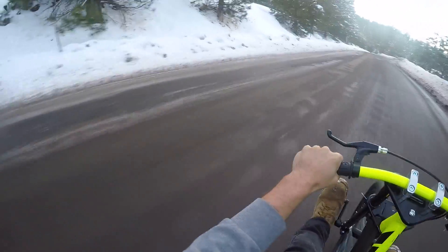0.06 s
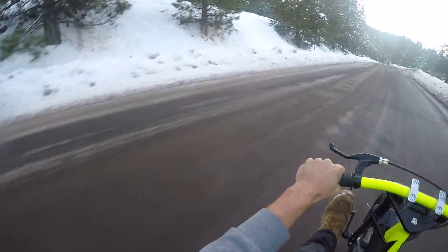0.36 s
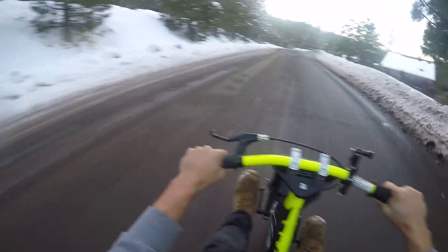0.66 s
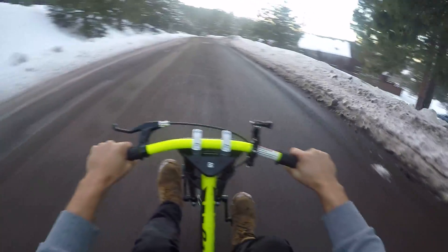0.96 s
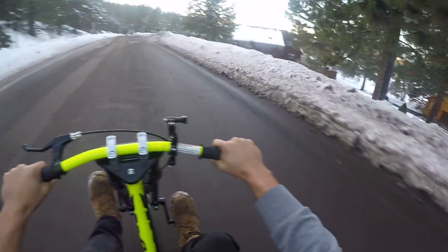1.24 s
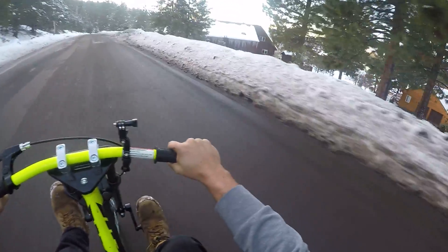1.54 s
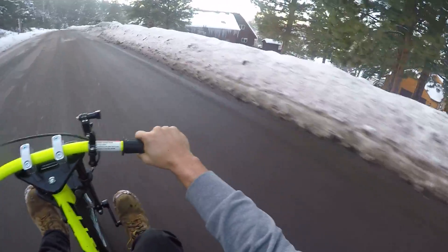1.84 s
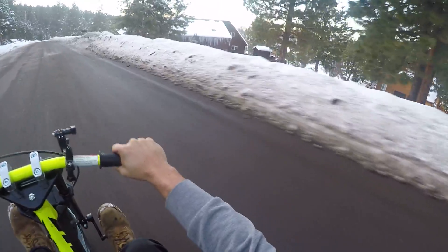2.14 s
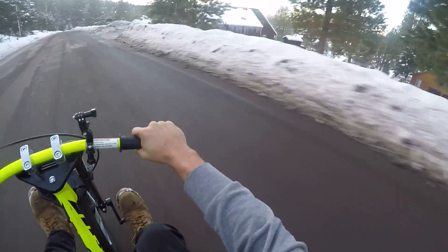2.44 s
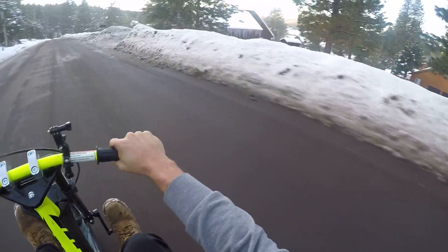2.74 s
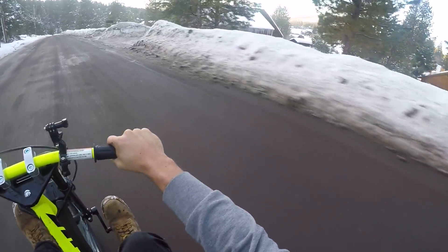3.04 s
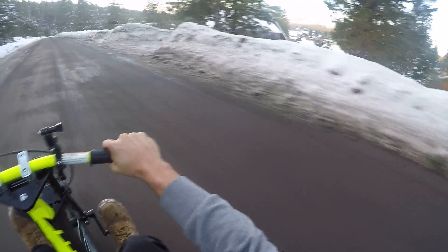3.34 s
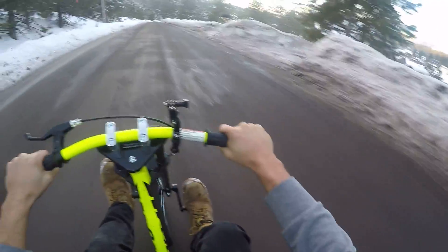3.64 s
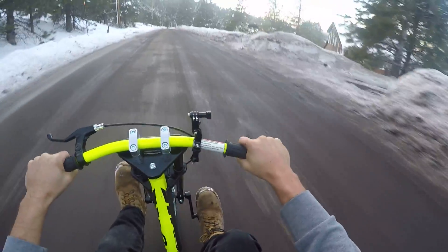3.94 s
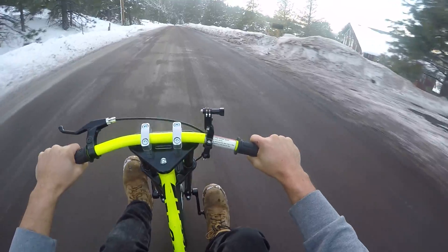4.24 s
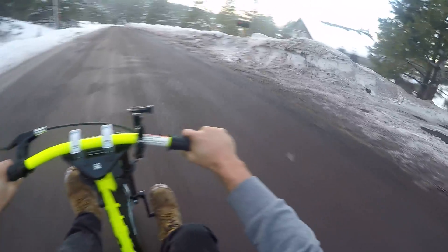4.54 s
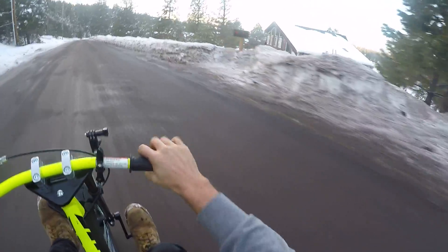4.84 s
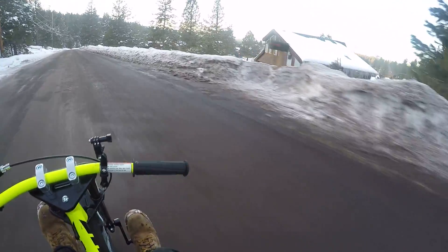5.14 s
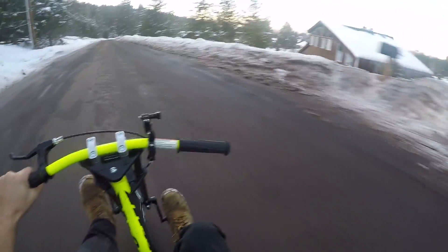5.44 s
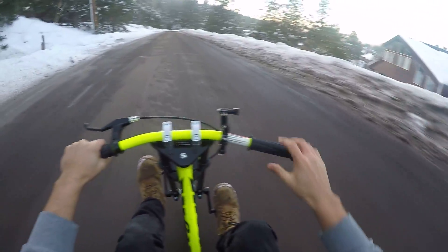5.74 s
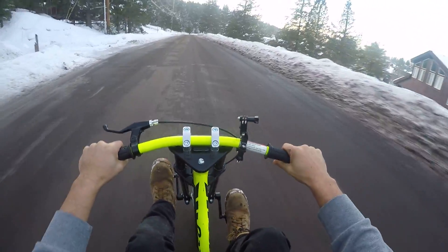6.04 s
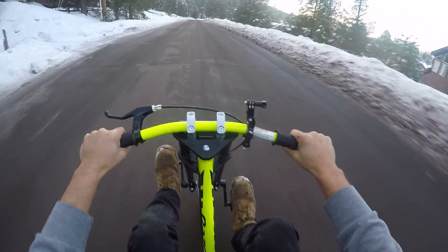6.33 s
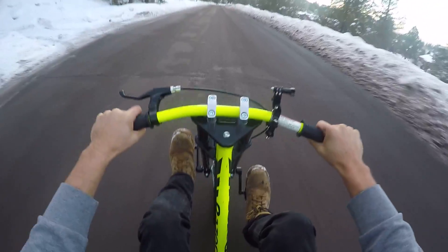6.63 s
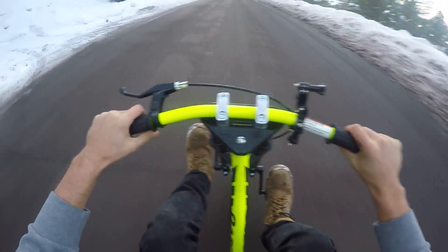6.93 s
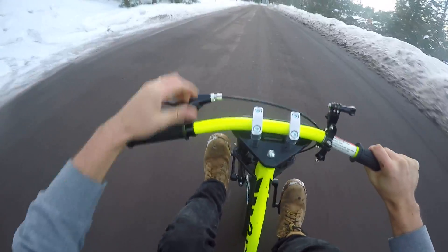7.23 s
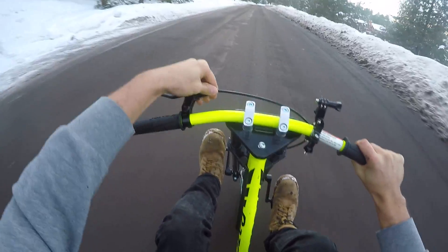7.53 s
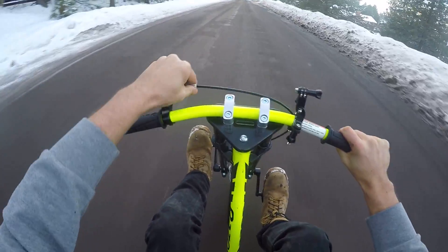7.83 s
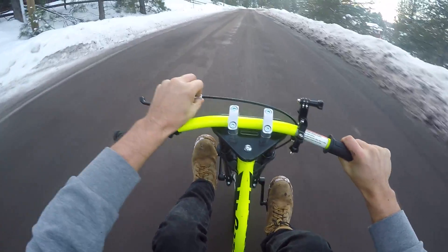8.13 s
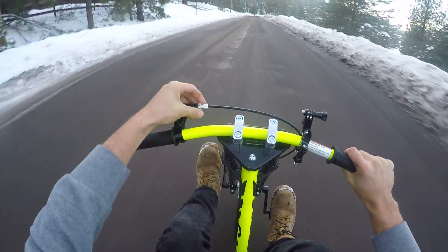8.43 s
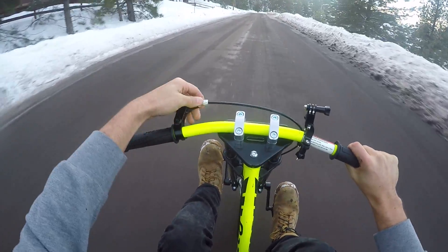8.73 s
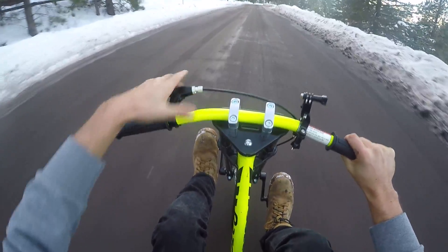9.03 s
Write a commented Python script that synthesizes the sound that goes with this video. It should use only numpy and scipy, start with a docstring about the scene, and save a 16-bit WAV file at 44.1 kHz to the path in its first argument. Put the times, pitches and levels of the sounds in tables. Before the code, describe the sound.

Wind rumbles and buffets a microphone on the rider for the whole nine seconds or so, while a drift trike's hard plastic wheels scrub over wet asphalt, crunch grit and throw a fine hiss of spray. The wind swells at about 0.7, 1.3 and 3.6 seconds. Small stones crack irregularly from the start, mixed with a few bright ticks like drops hitting the microphone. The grit crunches harder just after 2 seconds and again around 4. The wheels have a hollow, rasping ring as they slide, which changes as the trike straightens between 6 and 7 seconds. From there the scrub and spray are stronger. The loudest crack comes at about 7.1 seconds, followed by a cluster of smaller ones from 7.7 to 8.3 and a few more after. Short gusts thump the microphone near 7.3, 8.5 and 8.9 seconds as the trike keeps rolling.

```python
"""The hard plastic rear wheels of a drift trike, coasting down a wet, gritty road.
Heard close, from a microphone on the rider, they scrub on the asphalt, crunch grit, throw spray
and crack small stones. Their ring changes as the trike slides through bends or runs straight.
A few bright ticks, such as a drop hitting the microphone, fall among the cracks.
Behind them, wind rumbles off the rider's body and buffets the microphone."""
import sys
import numpy as np
from scipy import signal
from scipy.fft import rfft, irfft
from scipy.io import wavfile
from scipy.ndimage import uniform_filter1d, minimum_filter1d

SR = 44100
rng = np.random.default_rng(int(sys.argv[2]) if len(sys.argv) > 2 else 0)


def wrap_up_sound(samples):
    """Save the sound to the file named by the first command line argument, as 16-bit audio."""
    columns = np.atleast_2d(samples).T
    # keep every value between -1 and 1, then stretch to whole-number steps
    tamed = np.clip(columns, -1, 1)
    steps = np.round(tamed * 32767).astype(np.int16)
    wavfile.write(sys.argv[1], SR, steps)


N = 409248
TIME = np.arange(N) / SR


def amp(db):
    """Decibels to gain."""
    return 10 ** (np.asarray(db) / 20)


def unit(x):
    """Scales to an rms of one."""
    return x / np.sqrt(np.mean(x ** 2) + 1e-20)


def curve(rows):
    """A table of times and values, sample by sample."""
    return np.interp(TIME, *np.transpose(rows))


def spectrum_db(tone, hz):
    """Joins the points of a spectrum along a log-frequency axis."""
    points_hz, db = np.transpose(tone)
    return np.interp(np.log(hz + 1), np.log(points_hz + 1), db)


def bins(size):
    """Frequencies of a transform, in Hz."""
    return np.fft.rfftfreq(size, 1 / SR)


def wander(rate_hz, size=8192):
    """Smooth random drift with an rms of about one."""
    hz = np.fft.rfftfreq(size, N / SR / size)
    slow = rfft(rng.standard_normal(size)) / (1 + (hz / rate_hz) ** 4)
    return np.interp(TIME, np.linspace(0, N / SR, size), unit(irfft(slow, size)))


def swells(rows):
    """Each row rises and falls in one smooth arch; returns the dB added to each of two layers."""
    out = np.zeros((2, N))
    for peak_s, length_s, *db in rows:
        out += np.outer(db, np.cos(np.pi * np.clip((TIME - peak_s) / length_s, -.5, .5)))
    return out


# The line down the hill: time_s, slide_fraction
SIDEWAYS_SLIDE = [(0, 0.58), (.5, 0.74), (.8, 0.33), (1.3, 0.56), (1.7, 0.9), (3.5, 0.92), (3.8, 0.66),
                  (5.3, 1), (5.8, 0.55), (6.4, 0.46), (6.8, 0), (9.28, 0.03)]
def sliding():
    """How far the trike slides: 0 running straight, 1 fully drifting."""
    return np.clip(curve(SIDEWAYS_SLIDE), 0, 1)


def turbulence(straight_tone, cross_tone):
    """Air at the microphone; in a slide it comes from the side and booms differently."""
    slide = sliding()
    straight, cross = (unit(irfft(rfft(rng.standard_normal(N)) * amp(spectrum_db(tone, bins(N))), N))
                       for tone in (straight_tone, cross_tone))
    return np.sqrt(1 - slide) * straight + np.sqrt(slide) * cross


# Rumble around the rider, head-on and side-on: frequency_hz, level_db
HEAD_RUMBLE = [(10, -22), (22, 0), (47, -1.5), (75, -6), (110, -9.5), (150, -21.5), (250, -33), (600, -81),
               (4000, -110)]
SIDE_RUMBLE = [(10, -16), (22, -9), (50, 2.5), (80, 0.5), (110, -1), (150, -7.5), (250, -31), (600, -70),
               (4000, -110)]
# Its strength on the way down: time_s, level_db
RUMBLE_LEVEL = [(0, -24.5), (0.62, -17), (0.85, -26.5), (1.24, -12.5), (1.45, -21), (1.88, -18),
                (2.3, -15.5), (4.1, -17.5), (4.3, -17), (5.66, -14.5), (5.8, -25), (6.5, -17),
                (7.08, -21.0), (7.35, -13.0), (7.85, -23.5), (9.28, -20.5)]
def rumble(gain_db=1, eddy_db=1.4, eddy_hz=12):
    """The rider's body sheds large eddies, heard as a deep, unsteady rumble."""
    eddies = turbulence(HEAD_RUMBLE, SIDE_RUMBLE) * amp(eddy_db * wander(eddy_hz))
    return unit(eddies) * amp(curve(RUMBLE_LEVEL) + gain_db)


# Wind right on the microphone, head-on and side-on: frequency_hz, level_db
HEAD_BUFFET = [(50, -14), (100, -7), (150, 2), (220, -1.5), (300, -1.5), (370, -2), (445, -2), (510, -10.5),
               (600, -18.5), (700, -23), (1200, -26.5), (12000, -101)]
SIDE_BUFFET = [(50, -26), (95, -4), (145, 0), (220, -2), (300, -4), (370, -7.5), (440, -6.5), (510, -13),
               (600, -20), (700, -28), (1200, -39.5), (12000, -93)]
# Its rise and fall as the rider turns: time_s, level_db
BUFFET_LEVEL = [(0, -15.5), (0.66, -15), (0.8, -23), (1.05, -19.5), (1.3, -12.5), (1.9, -19.5),
                (2.35, -18.5), (3.3, -17.5), (3.62, -11), (3.85, -20), (4.46, -21), (4.62, -18),
                (5.65, -18.5), (5.78, -24.5), (6.5, -17), (7.85, -16.5), (8.1, -15), (9.28, -17)]
def buffet(flutter_db=1.37, flutter_hz=24):
    """Small eddies flutter at the microphone port."""
    eddies = turbulence(HEAD_BUFFET, SIDE_BUFFET) * amp(flutter_db * wander(flutter_hz))
    return unit(eddies) * amp(curve(BUFFET_LEVEL))


# Single gusts across the microphone: peak_s, length_s, rumble_change_db, buffet_change_db
WIND_GUSTS = [(0.03, 0.13, 4, 3.5), (0.68, .1, 7, 3), (2.15, 0.16, 2, 2), (2.55, 0.23, -1.5, 3.5),
              (4.3, 0.12, 5, 3), (4.73, 0.3, -1, 5.5), (5.42, 0.14, 3.5, 2.5), (6.5, 0.098, 1.5, 0),
              (7.197, 0.051, 1, 9), (7.33, .08, 5, 3.5), (8.23, .1, 0, 1), (8.476, 0.042, -11, 10.5),
              (8.74, 0.12, 5, 4), (8.923, 0.11, 8.5, 4)]
def wind():
    """Gusts briefly shift the levels of the rumble and the buffeting."""
    rumble_db, buffet_db = swells(WIND_GUSTS)
    return rumble() * amp(rumble_db) + buffet() * amp(buffet_db)


# Resonances and hollows of the plastic wheels: pitch_hz, width_hz, straight_db, sliding_db
WHEEL_MODES = [(750, 59, 8, 4), (971, 100, 5.5, 0), (1062, 45, 1.5, 6.5), (1204, 118, 1.5, 7),
               (1874, 174, 3, 6), (2164, 113, -4, -1), (2332, 270, 10.5, 7), (2624, 350, 6.5, 0),
               (2963, 154, 6.5, 4), (3214, 220, 5.5, 1), (3590, 106, -9, -11.5), (3954, 190, 3.5, 2),
               (4400, 390, 4.5, -1), (4830, 360, 2.5, 1.5), (6300, 1200, -4, -2), (12900, 350, 3, 3)]
def wheel_ring(tone, slide, extra_db=0, spot_db=0, size=2048):
    """A wheel's ring, of energy one; spot_db is how much the struck spot favours each resonance."""
    hz = bins(size)
    pitch_hz, width_hz, straight_db, sliding_db = np.transpose(WHEEL_MODES)
    shapes = .5 ** ((2 * (hz[:, None] - pitch_hz) / width_hz) ** 2)
    mode_db = straight_db + slide * (sliding_db - straight_db) + spot_db
    db = spectrum_db(tone, hz) + extra_db + shapes @ mode_db
    log_gain = np.log(amp(np.r_[db, db[-2:0:-1]]))
    minimum_phase = np.exp(np.conj(signal.hilbert(log_gain)))  # the ring follows the blow
    ring = np.fft.ifft(minimum_phase).real
    return ring / np.linalg.norm(ring)


def crunch(tone, per_s, spread_db, crumble_s, bed, max_spreads, spots=4):
    """Uneven grains crumble over a bed of finer ones; each spot on the wheels rings in its own colour."""
    slide = sliding()
    mode_angle = rng.uniform(0, 2 * np.pi, len(WHEEL_MODES))
    out = np.zeros(N)
    for spot in range(spots):
        sizes = amp(spread_db * np.minimum(rng.exponential(1, N), max_spreads))
        grains = sizes * (rng.random(N) < per_s / spots / SR)
        power = signal.lfilter([1], [1, -np.exp(-1 / (crumble_s * SR))], grains ** 2)
        force = np.sqrt(power / power.mean() + bed) * rng.standard_normal(N)
        spot_db = 4 * np.cos(mode_angle + 2 * np.pi * spot / spots)
        straight, drifting = (signal.oaconvolve(force, wheel_ring(tone, k, spot_db=spot_db))[:N]
                              for k in (0, 1))
        out += (1 - slide) * straight + slide * drifting
    return unit(out)


# Fine drops off the rear wheels: frequency_hz, level_db
DROPLET_SPECTRUM = [(2500, -24), (4500, -4), (6200, -1), (8000, -2), (9500, -4.5), (10900, -4),
                    (11800, -8.5), (15000, -9.5)]
def droplets(heavier_db, wetter_db, base_db=-54.5, splash_db=1.0, splash_hz=40):
    """Load squeezes water out from under the wheels, and it leaves in splashes."""
    drops = crunch(DROPLET_SPECTRUM, per_s=110, spread_db=8, crumble_s=.0009, bed=.54, max_spreads=3.3)
    splashes = unit(drops * amp(splash_db * wander(splash_hz)))
    return splashes * amp(base_db + .93 * wetter_db + .2 * heavier_db)


# Spray just behind the rider: frequency_hz, level_db
SPRAY_SPECTRUM = [(1200, -28.5), (2800, -6.5), (3900, 0.5), (5000, -1), (6200, -2), (7200, -13),
                  (9000, -21), (11000, -33), (12000, -40), (15000, -43)]
def spray(water_db, gain_db=2):
    """The wheels fling water off the road in a grainy hiss."""
    hiss = crunch(SPRAY_SPECTRUM, per_s=240, spread_db=5, crumble_s=.0014, bed=.15, max_spreads=3.7)
    return hiss * amp(water_db + gain_db)


# Loose grit at road level: frequency_hz, level_db
GRIT_SPECTRUM = [(400, -10), (1000, -4.5), (1600, 3), (2600, 1), (3300, -1.5), (4500, -7), (6000, -15.5),
                 (7500, -21.5), (11000, -36), (15000, -42)]
def grit(heavier_db, wetter_db, base_db=-35):
    """Grit crunches louder under more load and in more water, which carries it."""
    grains = crunch(GRIT_SPECTRUM, per_s=240, spread_db=4.5, crumble_s=.0013, bed=.17, max_spreads=3.15)
    return grains * amp(base_db + .65 * heavier_db + .45 * wetter_db)


# A crack, heard close: frequency_hz, level_db
CRACK_SPECTRUM = [(300, -32), (900, -7), (1600, -6), (2600, -3.5), (4000, 1.5), (5200, 0.5), (6500, -4),
                  (9000, -6), (12000, -15), (15000, -17)]
# Stone cracks and a few bright ticks, such as a drop hitting the microphone:
# start_s, level_db, hardness_db (near 5 kHz), snap_db (near 10 kHz)
CRACKS_AND_TICKS = [(0.1908, -27, -9, -25), (0.3953, -27, -1, -22), (0.4843, -20.5, -26, -27),
                    (0.5711, -19, -5, -18), (1.0927, -22, -4, -25), (1.1453, -26.5, 1, -2),
                    (1.381, -28, 1, -14), (1.921, -24.5, -14, -32), (2.324, -32, -4, -15),
                    (2.9335, -24, -20, -20), (3.1598, -23, -22, -36), (3.325, -21, -11, -32),
                    (3.439, -26, -9, -31), (3.62, -37, -14, 8), (4.2351, -22, -12, -26),
                    (4.923, -24.5, -11, -22), (5.2629, -16, -6, -15.5), (5.2932, -24, -11, -25),
                    (5.308, -24, -9, -17), (5.426, -24.5, -9.5, -20), (5.5804, -25, 0, -22),
                    (5.808, -24, 5, -14), (5.926, -27, 4, -21), (6.296, -25, -4, -27),
                    (6.3234, -24, 7, -17), (6.42, -26, 10, -5), (6.4423, -24, -4, -28),
                    (6.5016, -23, -28, -35), (6.7754, -19.5, -5, -14), (6.9062, -22, -7, -22),
                    (7.126, -6, -6, -15), (7.2938, -15, -4, -22), (7.6628, -17, -5.5, -26),
                    (7.689, -18, -10, -36), (7.705, -20.5, 4, -4), (7.7257, -22, -1, -18),
                    (7.796, -27, -11, -25), (7.84, -21, -2, -12), (7.8593, -20, -10, -16),
                    (7.892, -19, -5, -18), (8.0237, -18, -8, -21), (8.0622, -18, -13, -25),
                    (8.1718, -23, 2, -19), (8.262, -28.5, -2, 3), (8.289, -24, 10, -21),
                    (8.5698, -23.5, 5, -4), (8.765, -18, -1, -10), (8.8842, -15.5, 0, -16),
                    (9.083, -22, 1, -18)]
def cracks(gain_db=1, first_blow=4.0, crack_s=.0017, brittleness=.2, knock=.3, span_s=.0057, size=2048):
    """A blow and a brief crumble, coloured by the wheel; snappy hits die faster, soft ones knock."""
    out = np.zeros(N + 2 * size)
    t, hz = np.arange(size) / SR, bins(size)
    slide = sliding()
    for start_s, level_db, hardness_db, snap_db in CRACKS_AND_TICKS:
        start = round(start_s * SR)
        knock_db = -knock * min(hardness_db, 0)
        colour = [(1300, knock_db), (2800, 0), (4400, hardness_db), (6200, hardness_db), (8200, snap_db)]
        force = rng.standard_normal(size) * np.exp(-t / crack_s * amp(brittleness * snap_db))
        force[0] = first_blow
        ring = wheel_ring(CRACK_SPECTRUM, slide[start], spectrum_db(colour, hz))
        crack = signal.fftconvolve(force, ring)
        crack *= np.sqrt(span_s * SR) / np.linalg.norm(crack)  # the energy of unit rms over span_s
        out[start:start + len(crack)] += amp(level_db + gain_db) * crack
    return out[:N]


# Plastic on asphalt, just below the microphone: frequency_hz, level_db
SCRUB_SPECTRUM = [(300, -11.5), (650, -2.5), (900, 4.5), (1250, 2), (1450, 0), (2000, -8), (3200, -16.5),
                  (5500, -36), (8000, -42), (15000, -52)]
def scrub(load_db, gain_db=.5):
    """Hard plastic rasps over the asphalt, louder the harder it bears down."""
    rasp = crunch(SCRUB_SPECTRUM, per_s=700, spread_db=2.5, crumble_s=.0017, bed=.39, max_spreads=4.5)
    return rasp * amp(load_db + gain_db)


# How hard the wheels bear on the road, heard as scrub: time_s, level_db
WHEEL_LOAD = [(0, -33), (0.65, -35), (0.85, -38), (1.2, -35.5), (1.8, -36.5), (2.55, -32.0), (3.2, -31.5),
              (3.47, -28), (3.8, -39), (4.3, -34.0), (4.95, -34), (5.25, -33), (5.78, -41.5), (6.3, -35),
              (6.85, -29), (7.15, -29.5), (7.5, -32), (8.1, -31.5), (9.28, -31)]
# Water lying on the road, heard as spray: time_s, level_db
ROAD_WATER = [(0, -50), (0.45, -47), (0.72, -39.5), (1.15, -37), (1.65, -44), (2.3, -41.5), (2.85, -47),
              (3.75, -42.5), (3.92, -44), (4.2, -40), (5.3, -43), (5.7, -42.5), (5.88, -38), (6.05, -41),
              (6.42, -35), (7.1, -33), (7.45, -38), (8.15, -34), (9.28, -37)]
# Sand and puddles along the way: middle_s, length_s, grit_change_db, water_change_db
ROAD_PATCHES = [(0.18, 0.2, 3, 4), (1.2, 0.28, 1.5, 1.5), (2.1, 0.083, 8, -2), (2.32, .1, 6.5, 1),
                (4.02, 0.19, 6.5, 1), (4.28, 0.23, 6, 2), (7.03, 0.12, 2, 4), (7.58, 0.091, 2.5, 7.5)]
def wheels(chatter_db=.97, chatter_hz=40, uneven_db=.44, uneven_hz=16):
    """The wheels scrub, crush grit and fling water; their contact chatters over the rough surface."""
    load_db, water_db = curve(WHEEL_LOAD), curve(ROAD_WATER)
    heavier_db, wetter_db = load_db - load_db.mean(), water_db - water_db.mean()
    sand_db, puddle_db = swells(ROAD_PATCHES)
    rasp = scrub(load_db)
    loose = grit(heavier_db, wetter_db) * amp(sand_db)
    wet = (spray(water_db) + droplets(heavier_db, wetter_db)) * amp(puddle_db)
    uneven = amp(uneven_db * wander(uneven_hz))  # grit and water lie unevenly on the road
    chatter = amp(chatter_db * wander(chatter_hz))
    return (rasp + (loose + wet) * uneven) * chatter


def scene():
    """Wind, wheels and cracks at one microphone on the rider."""
    return (wind() + wheels() + cracks())[None]


def record(dry, ceiling=.94, hold_s=.0034, edge_hz=15450):
    """A fast limiter holds the largest peaks down; a low-pass then cuts the highest treble."""
    reach = round(hold_s * SR)
    gain = np.minimum(1, ceiling / (abs(dry) + 1e-9))
    limited = dry * uniform_filter1d(minimum_filter1d(gain, reach), reach)
    lowpass = signal.firwin(255, edge_hz, window=("kaiser", 8), fs=SR)
    return signal.oaconvolve(limited, lowpass[None], "same")


dry = scene()
out = record(dry)
wrap_up_sound(out)
```